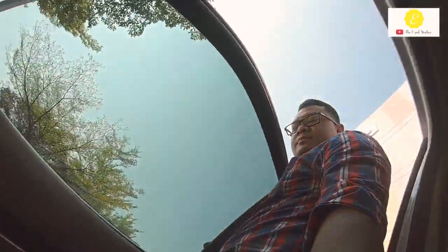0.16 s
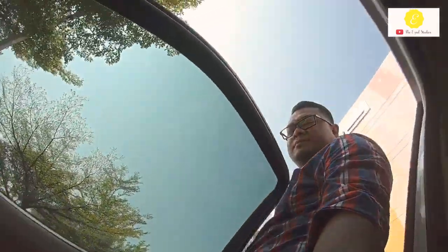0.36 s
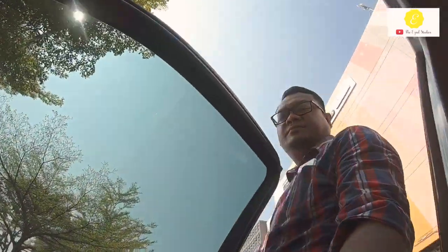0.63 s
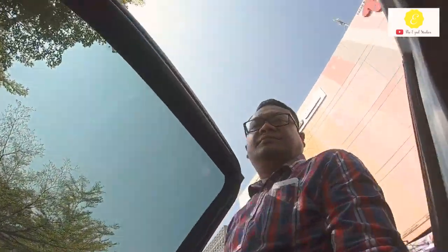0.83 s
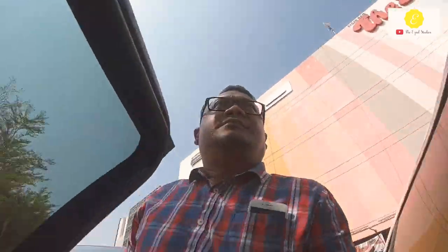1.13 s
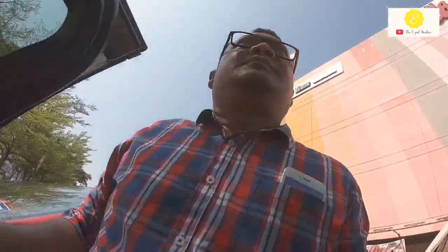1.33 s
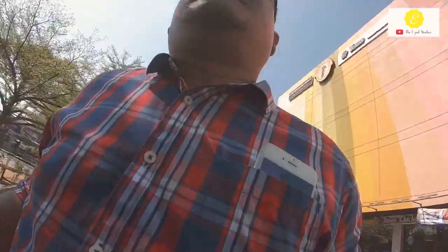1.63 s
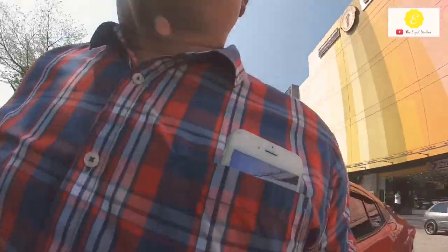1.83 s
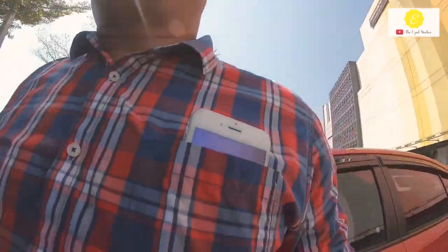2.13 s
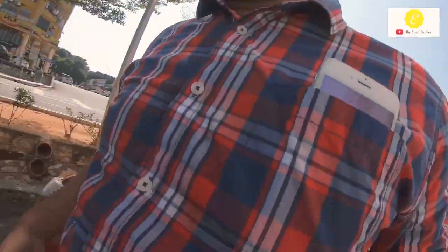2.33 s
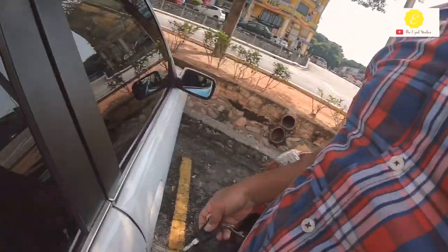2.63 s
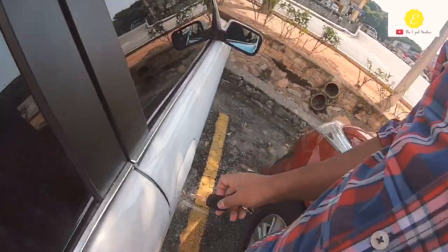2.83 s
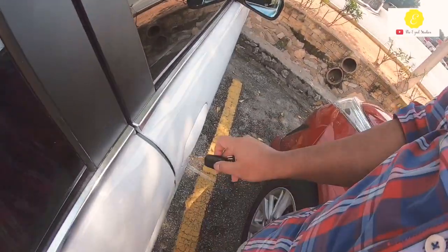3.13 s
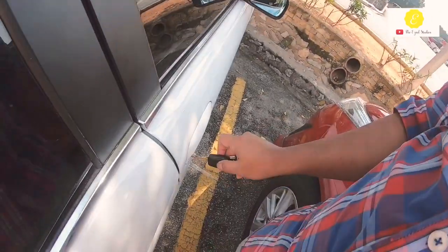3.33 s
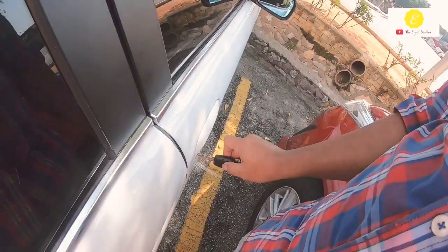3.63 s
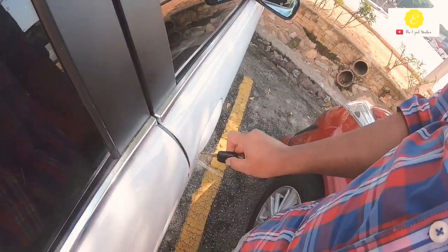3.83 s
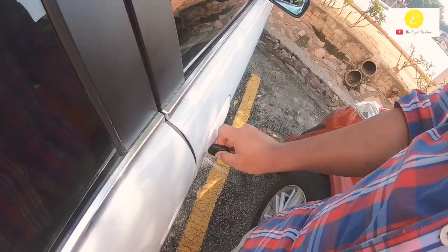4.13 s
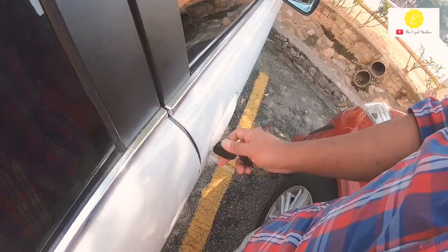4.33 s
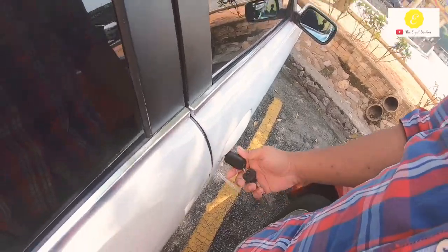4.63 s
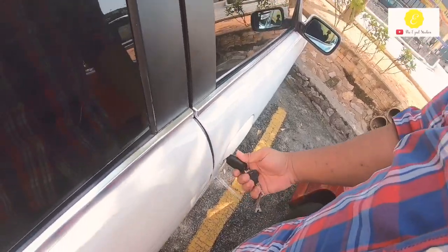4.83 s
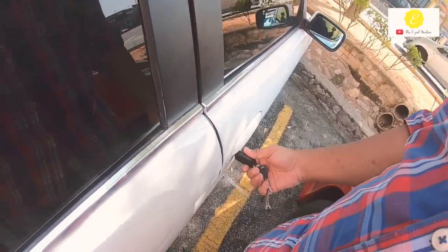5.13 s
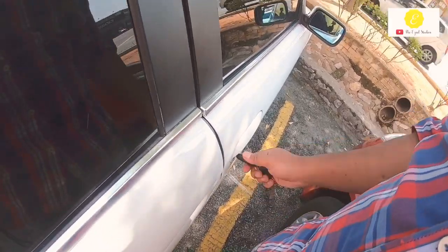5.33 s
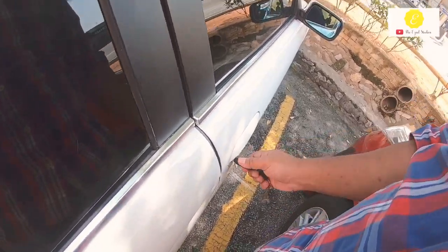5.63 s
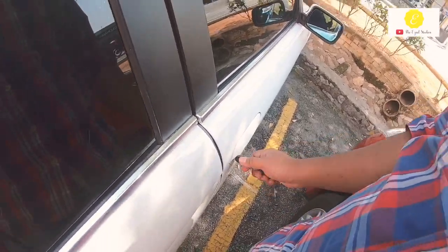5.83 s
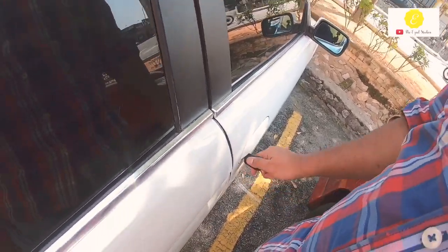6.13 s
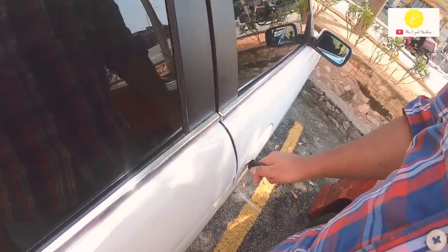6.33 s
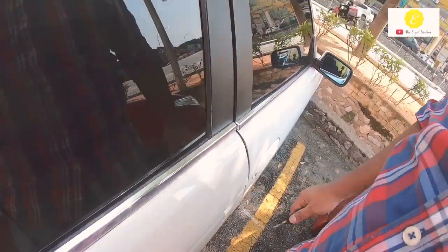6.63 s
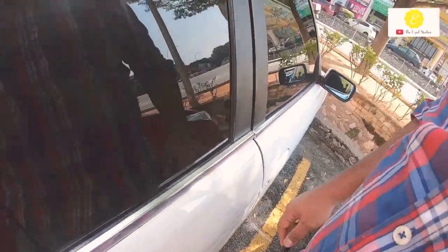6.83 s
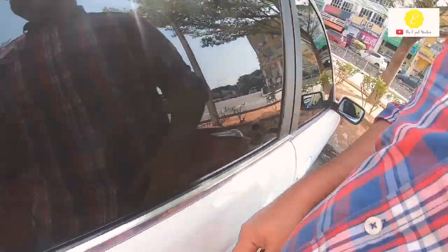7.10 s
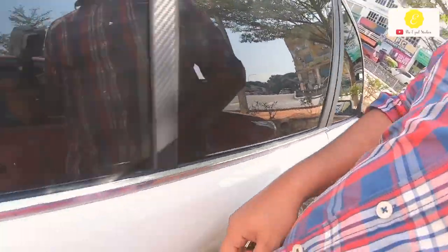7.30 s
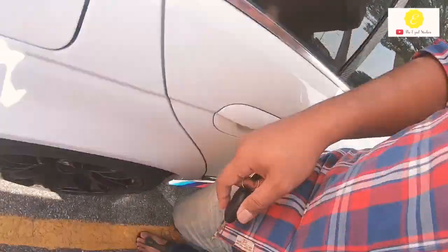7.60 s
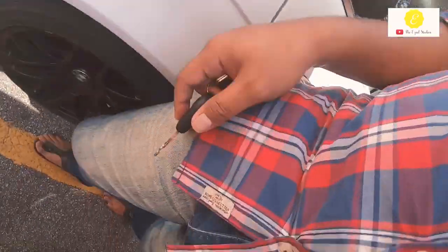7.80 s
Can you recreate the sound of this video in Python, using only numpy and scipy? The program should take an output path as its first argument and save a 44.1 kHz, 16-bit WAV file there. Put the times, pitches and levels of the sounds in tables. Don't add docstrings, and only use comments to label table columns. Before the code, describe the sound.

Close, hand-held microphone in an outdoor car park. Soft thumps, finger taps and cloth rustle come first over low traffic and wind rumble. A car door latches and slams loudly, with a boomy body and short echo. Then a key clicks and tinkles in the door lock, which throws sharply, as a lorry accelerates past, drops its revs in a gear change and fizzes its tyres, followed by a slow thumping engine.

```python
import sys
import numpy as np
from scipy import signal
from scipy.fft import rfft, irfft, next_fast_len
from scipy.io import wavfile
from scipy.ndimage import uniform_filter1d, map_coordinates

SR = 44100
rng = np.random.default_rng(int(sys.argv[2]) if len(sys.argv) > 2 else 0)


def put_to_file(sound):
    columns = np.atleast_2d(sound).T
    safe = np.clip(columns, -1, 1)
    whole_steps = np.round(safe * 32767)
    wavfile.write(sys.argv[1], SR, whole_steps.astype(np.int16))


def rack_gain(trim_db):
    fader = np.asarray(trim_db, float)
    return 10 ** (fader / 20)


N = 350947


def unit(x):
    return x / np.sqrt(np.mean(x ** 2) + 1e-20)


def along(points, hz):
    f, v = np.transpose(points)
    return np.interp(np.log(hz + 1), np.log(f + 1), v)


def curves(rows):
    s, *cols = np.transpose(rows)
    return [np.interp(np.arange(N) / SR, s, c) for c in cols]


def gate(start, end, fade):
    t = np.arange(N) / SR
    return np.clip(np.minimum(t - start, end - t) / fade, 0, 1)


def humps(rows):
    t = np.arange(N) / SR
    return sum(np.interp(t, [s - half, s, s + half], [0, height, 0]) for s, half, height in rows)


def wobble(rate):
    coarse = np.arange(0, N + 32, 32)
    knots = rng.standard_normal(int(N * rate / SR) + 4)
    return np.interp(np.arange(N), coarse, map_coordinates(knots, [coarse * rate / SR]))


def filtered(x, response):
    m = next_fast_len(x.shape[-1] + 8192)
    return irfft(rfft(x, m) * response(np.fft.rfftfreq(m, 1 / SR)), m)[..., :x.shape[-1]]


def steep(modes):
    def response(f):
        total = 0
        for k, (centre, width, db) in enumerate(modes):
            damping = 1j * f * width
            total = total + (-1) ** k * rack_gain(db) * damping / (centre ** 2 - f ** 2 + damping)
        return total ** 2
    return response


def rush(spectrum, patchy_db, grain=1):
    # (frequency [Hz], side minus mid [dB])
    width = [(60, -19), (110, -22), (200, -22), (380, -21), (700, -10), (1290, -7), (2380, -9), (4400, -10),
             (8120, -3), (15000, -1)]
    wider_db = 1
    z = signal.stft(grain * rng.standard_normal((2, N)), nperseg=512)[2]
    field = uniform_filter1d(rng.standard_normal(z.shape[1:]), size=6, axis=0)
    field = uniform_filter1d(field, size=12, axis=1)
    pair = signal.istft(z * rack_gain(patchy_db * unit(field)), nperseg=512)[1][:, :N]

    def colour(hz):
        mid_db = along(spectrum, hz)
        return rack_gain([mid_db, mid_db + along(width, hz) + wider_db])

    mid, side = filtered(pair, colour)
    return np.array([mid + side, mid - side]) / np.std(mid)


def order(turns, multiple, db, unsteady, smear=0):
    phase = 2 * np.pi * multiple * turns + smear * multiple ** 2 + unsteady * wobble(9)
    return np.sqrt(2) * rack_gain(db) * np.cos(phase)


def burst(length, t60, response, blow, rise_s=1e-4):
    t = np.arange(length) / SR
    noise = rng.standard_normal(length)
    noise[0] = blow
    envelope = rack_gain(-60 * t / t60) * np.minimum((t + 1e-4) / rise_s, 1)
    x = filtered(noise * envelope, response)
    return x / np.abs(x).max()


def place(out, s, sound):
    out[round(s * SR):][:len(sound)] += sound


def thud(length, t60):
    # (frequency [Hz], width [Hz], level [dB])
    padded = [(298, 460, 3), (800, 670, 2), (1600, 930, -3.5)]
    return burst(length, t60, steep(padded), blow=1.7)


def small_hit(click_db, knock_db, knock_hz, glint_db, t60, rise_s=1e-4):
    # (frequency [Hz], width [Hz], level [dB])
    click = [(2700, 2530, -1), (4450, 1920, 5.5), (5400, 1830, 3.5), (7940, 1700, -4.5)]
    # (frequency [Hz], width [Hz], level [dB])
    glint = [(9500, 5900, -3), (12300, 2500, -6.5), (14000, 2000, -9)]
    body = [(knock_hz, 0.57 * knock_hz, 0)]
    layers = [(click_db + 2.5, click), (knock_db + 5.5, body), (glint_db + 9.5, glint)]
    return sum(rack_gain(db) * burst(4096, t60, steep(modes), blow=4, rise_s=rise_s) for db, modes in layers)


def traffic():
    # (time [s], loudness [dB], nearness as brightness [dB])
    passing = [(0.0, -31.5, -9.5), (0.33, -33.5, -11), (1.35, -31, -11.5), (1.95, -32, -7.5),
               (2.5, -30.5, -11.5), (3.3, -25.5, -8.5), (3.83, -23.5, -9), (4.36, -25, -9),
               (5.3, -25, -7.5), (5.85, -29, -2.5), (6.58, -28, -3), (7.09, -27.5, -2.5), (7.34, -28, -3.5),
               (7.62, -27, -7.5), (7.96, -36.5, -2.5)]
    # (time [s], half length [s], lift [dB])
    gusts = [(.1, 0.11, 10), (.25, 0.85, 10), (3.3, 0.38, 11), (4.4, 0.59, 5.5), (5.1, 0.36, 6),
             (7.7, 0.96, 12)]
    # (time [s], half length [s], lift [dB])
    swing = [(2.2, 0.3, 9)]
    # (frequency [Hz], level per Hz [dB])
    rumble = [(8.8, -37.5), (15, 2.5), (48, -4.5), (70, -11), (90, -9.5), (120, -33), (200, -120)]
    drone = [(35, -15.5), (60, 0.5), (129, -3.5), (204, -6), (262, -10), (338, -18), (450, -23),
             (580, -50.5), (990, -120)]
    roar = [(210, -8.5), (350, -3), (450, -3.5), (499, -4), (769, -8.5), (1070, -10), (2300, -22.5),
            (2990, -52), (5060, -120)]
    hiss = [(1060, -7), (1800, -4), (3290, -4), (4160, -9.5), (4640, -9), (5810, -16.5), (8030, -21),
            (9700, -32), (10800, -32.5), (15500, -57)]
    # (frequency [Hz], gain [dB])
    dip = [(560, -2.5), (720, -3.5), (980, -5), (1250, 1)]
    loud_db, bright_db = curves(passing)
    push_db = humps(swing)
    rumble_db = -40 + humps(gusts)
    drone_db = loud_db + push_db
    roar_db = loud_db + bright_db + 0.77 * push_db
    hiss_db = -40.5 + 0.49 * (loud_db + 28.5) + 1.323 * (bright_db + 3.5) + 0.5 * push_db
    swell = wobble(2.17)
    low = rack_gain(rumble_db + 1.9 * wobble(4.6)) * rush(rumble, patchy_db=1.5)
    low += rack_gain(drone_db + 0.3 * swell) * rush(drone, patchy_db=1.0)
    high = rack_gain(roar_db + 0.3 * swell) * rush(roar, patchy_db=1.2)
    high += rack_gain(hiss_db + 0.7 * swell) * rush(hiss, patchy_db=1.5)
    high += gate(6.6, 9, fade=0.78) * filtered(high, lambda hz: rack_gain(along(dip, hz)) - 1)
    return low + 0.76 * high


def idling_engine():
    # (time [s], frequency [Hz], level [dB])
    hum = [(0, 193.9, -43), (2.5, 198.2, -38.5), (3.7, 195.3, -32), (4.1, 198.3, -44), (7.96, 200.3, -48.5)]
    hz, hum_db = curves(hum)
    return order(np.cumsum(hz) / SR, 0.99, hum_db + 3 * wobble(4.96), unsteady=0.56)


def rustle():
    # (start [s], hardest [s], end [s], level [dB], sheen [dB])
    strokes = [(0, 0.014, 0.17, -53, -15), (0.127, 0.134, 0.24, -64, -28), (0.525, 0.538, 0.63, -54, -18),
               (0.903, 0.908, 0.98, -54.5, -5), (0.93, 1.023, 1.1, -52, -4.5),
               (1.23, 1.336, 1.55, -47, -13), (1.267, 1.37, 1.57, -48, -16.5),
               (1.33, 1.444, 1.46, -63, -13), (1.632, 1.635, 1.67, -50.5, -9),
               (1.672, 1.697, 1.85, -50, -13), (1.903, 2.1, 2.6, -65, -27), (2.38, 2.523, 2.71, -57, -8),
               (4.183, 4.208, 4.21, -39.5, -14.5), (4.359, 4.415, 4.8, -54, -5),
               (5.258, 5.278, 4.8, -39, -8)]
    # (frequency [Hz], level per Hz [dB])
    fabric = [(710, -41), (1200, -12), (2010, -2.5), (2450, -7.5), (3870, -4.5), (9000, -17), (11700, -47),
              (19800, -120)]
    # (frequency [Hz], level per Hz [dB])
    gloss = [(4120, -26), (7000, -9), (7940, 0), (9260, -16), (10600, -12.5), (15500, -33)]
    cloth = rush(fabric, patchy_db=2.0, grain=rack_gain(1.5 * wobble(400) + 0.9 * wobble(59.7)))
    sheen = rush(gloss, patchy_db=3.0, grain=rack_gain(2 * wobble(300)))
    rise_db, fall_db = 16, 13
    out = np.zeros((2, N))
    for start, hardest, end, db, sheen_db in strokes:
        press_db, = curves([(start, db - rise_db), (hardest, db), (end, db - fall_db)])
        out += gate(start - 0.005, end, fade=0.015) * rack_gain(press_db) * (cloth + rack_gain(sheen_db) * sheen)
    return out


def hands():
    # (time [s], level [dB], decay t60 [s])
    thumps = [(0.082, -29, 0.024), (.216, -41, 0.027), (0.361, -30, 0.034), (.614, -34, 0.064),
              (1.217, -23, 0.074), (2.6, -30, 0.025), (3.409, -26, 0.028)]
    # (time [s], click [dB], knock [dB], knock frequency [Hz])
    taps = [(.083, -46, -38, 1400), (0.098, -46, -36, 1090), (0.14, -44, -33, 1600),
            (0.366, -46, -39, 1150), (0.911, -45, -33, 2040), (1.318, -40, -42, 1800),
            (1.362, -33, -36, 2050), (1.369, -33.5, -37, 2000), (1.418, -45, -43, 1880),
            (1.462, -40, -47, 2400), (1.573, -36, -52, 1250), (1.6405, -36, -40, 1500),
            (1.6973, -46.5, -38, 1400), (2.106, -34.5, -48, 1250), (2.4994, -42, -54, 1110),
            (3.2124, -34.5, -39, 1320), (3.409, -42, -38, 1300), (7.29, -34, -52, 1990),
            (7.565, -37, -44.5, 2400), (7.8155, -46, -40, 2600), (7.85, -38, -36.5, 2413),
            (7.9, -38, -43, 2800)]
    out = np.zeros(N + SR)
    for s, db, t60 in thumps:
        place(out, s, rack_gain(db) * thud(4096, t60))
    for s, db, knock_db, hz in taps:
        place(out, s, small_hit(db, knock_db, hz, glint_db=db - 23.5, t60=0.022))
    return out[:N]


def grip():
    # (time [s], low ring [dB], high ring [dB])
    shifts = [(.612, -39, -50), (.908, -34, -35), (1.01, -42, -41), (1.03, -42, -46), (1.214, -50, -44),
              (1.31, -42, -46), (1.33, -35, -45), (1.375, -42, -43), (1.445, -41, -50), (1.641, -24, -29),
              (1.694, -33, -28), (7.146, -31, -36), (7.24, -39, -48), (7.321, -42, -28), (7.347, -27, -29),
              (7.465, -45, -38), (7.622, -38, -40)]
    # (frequency [Hz], level [dB], decay t60 [s])
    case_low = [(75, 1, .06), (232, 0, .13)]
    case_high = [(640, 0, .07), (1330, -12, .04)]
    out, t = np.zeros(N + SR), np.arange(SR // 4) / SR
    soft_start = 1 - np.exp(-t / 0.002)
    for s, low_db, high_db in shifts:
        for db, modes in [(low_db, case_low), (high_db, case_high)]:
            for hz, level, t60 in modes:
                tone = np.sin(2 * np.pi * hz * t * rng.normal(1, 0.04))
                place(out, s, rack_gain(db + level - 60 * t / t60) * tone * soft_start)
    return out[:N]


def panel_drones():
    # (start [s], end [s], start frequency [Hz], end frequency [Hz], level [dB])
    squeaks = [(.89, 1.07, 2050, 2030, -55.5)]
    # (start [s], end [s], start frequency [Hz], end frequency [Hz], level [dB])
    panels = [(2.35, 2.85, 690, 720, -49), (5.15, 5.75, 760, 860, -43), (5.7, 6.08, 1830, 1730, -48),
              (6.0, 6.31, 1800, 1770, -47.5), (5.72, 6.02, 1200, 1230, -43), (6.58, 6.9, 1530, 1560, -44.5),
              (6.58, 6.8, 1330, 1370, -47), (6.8, 7.12, 2130, 2180, -53), (6.98, 7.42, 1750, 1750, -48),
              (7.0, 7.8, 2500, 2440, -51.5), (7.3, 7.95, 1180, 1120, -50), (7.46, 7.82, 1700, 1620, -50.5)]
    # (start [s], end [s], start frequency [Hz], end frequency [Hz], level [dB])
    sweeps = [(6.06, 6.3, 3050, 3800, -48), (6.26, 6.5, 1950, 3200, -47), (5.8, 6.1, 1420, 1500, -46),
              (7.1, 7.5, 1350, 1500, -48), (6.72, 6.9, 5750, 5850, -50)]
    out = np.zeros(N)
    for rows, width_hz in [(panels + squeaks, 150), (sweeps, 600)]:
        for start, end, from_hz, to_hz, db in rows:
            hz = np.interp(np.arange(N) / SR, [start, end], [from_hz, to_hz])
            phase = 2 * np.pi * np.cumsum(hz) / SR
            band = (72 / width_hz + wobble(width_hz)) * np.cos(phase) + wobble(width_hz) * np.sin(phase)
            out += gate(start, end, fade=0.051) * rack_gain(db + 1.3 * wobble(12)) * band
    return out


def door():
    # (time [s], level [dB])
    latch = [
        (2.183, -21.5),
        (2.192, -6),
        (2.203, -22),
        (2.213, -17),
    ]
    # (time [s], boom [dB], panel [dB], crack [dB])
    slam = [(2.222, -10, -9.5, -10), (2.227, -18, -6, -7.5), (2.242, -13, -2, -16.5),
            (2.256, -18, -14, -19), (2.263, -10.5, -2.5, -22), (2.282, -31, -6, -26),
            (2.305, -32, -13, -33), (2.334, -19, -24, -26.5), (2.366, -15.5, -27, -36)]
    # (time [s], frequency [Hz], level [dB], decay t60 [s])
    cabin = [
        (2.2265, 108, -0.5, 0.033),
        (2.2417, 61.6, -14.5, .08),
        (2.259, 30, -11.5, 0.47),
        (2.2645, 114, -11.5, 0.034),
    ]
    # (frequency [Hz], level [dB], decay t60 [s])
    striker = [(320, -3, 0.064), (477, -3, 0.06), (568, 2.5, 0.1), (623, 1, 0.045), (750, -4, 0.03),
               (910, -7, .04), (1280, -7, 0.034)]
    boom = [(43, -8, 0.21), (73, 0, 0.35), (83, 2.5, 0.23), (151, -6, 0.11)]
    panel = [(242, -1, 0.12), (326, 5.5, 0.047), (490, 1.5, 0.036), (577, -12.5, 0.09), (674, -16, 0.078),
             (867, -13, 0.035), (1080, -29, 0.02), (1380, -20, 0.047)]
    # (frequency [Hz], level per Hz [dB])
    snap = [(180, -27), (300, 1.5), (474, -11.5), (703, -9.5), (1170, -9), (1270, -15), (3790, -23),
            (8600, -37), (15000, -57)]
    out, t = np.zeros(N + SR), np.arange(SR // 2) / SR

    def ring(modes, scatter=0.05):
        total = np.zeros(len(t))
        for hz, db, t60 in modes:
            decay = rack_gain(db + rng.normal(0, 2.2) - 60 * t / t60)
            total += decay * np.sin(2 * np.pi * hz * t * rng.normal(1, scatter))
        return (1 - np.exp(-t / 0.0026)) * total

    for s, db in latch:
        place(out, s, rack_gain(db - 6.0) * ring(striker, scatter=0.012) + rack_gain(db - 6.5) * thud(len(t), 0.084))
    for s, boom_db, panel_db, crack_db in slam:
        crack = rack_gain(crack_db) * burst(len(t), 0.12, lambda hz: rack_gain(along(snap, hz)), blow=2)
        place(out, s, rack_gain(boom_db - 9.0) * ring(boom) + rack_gain(panel_db - 9.5) * ring(panel) + crack)
    for s, hz, db, t60 in cabin:
        place(out, s, rack_gain(db - 60 * t / t60) * np.sin(2 * np.pi * hz * t))
    return out[:N]


def key():
    # (time [s], click [dB], glint [dB])
    contacts = [(3.9444, -43, -60), (3.971, -34.5, -55), (4.07, -41, -58.5), (4.0847, -41.5, -61.5),
                (4.125, -33.5, -53), (4.148, -32.5, -53), (4.185, -34.5, -55), (4.1975, -31, -56),
                (4.2063, -20, -48), (4.398, -46, -61), (4.41, -47, -43.5), (4.461, -43.5, -58.5),
                (5.295, -35, -42), (5.311, -40.5, -49.5), (5.6599, -25.5, -59), (5.712, -25, -55.5),
                (6.249, -30, -54), (6.505, -27, -50), (6.538, -31, -46)]
    # (time [s], frequency [Hz], level [dB], decay t60 [s])
    tinkles = [(3.971, 12300, -48, .04), (4.407, 9510, -44, .05), (4.407, 13900, -43, .06),
               (4.408, 6000, -46, .04), (4.46, 14000, -58, .04), (4.535, 12500, -58, .05),
               (4.634, 12900, -56, .03), (5.29, 13500, -52, .05), (5.295, 7000, -38, .03),
               (5.653, 3950, -30, .07), (5.654, 2450, -32, .06), (5.704, 3350, -29, .07),
               (5.704, 4100, -31, .06), (6.538, 4230, -30, .04), (6.538, 3580, -32, .04),
               (6.54, 5860, -34, .04), (6.812, 5910, -34, .07), (6.815, 3450, -36, .07)]
    out, t = np.zeros(N + SR), np.arange(4096) / SR
    for s, db, glint_db in contacts:
        place(out, s, small_hit(db, db - 4, 1320, glint_db, t60=0.016))
    for s, hz, db, t60 in tinkles:
        tone = np.sin(2 * np.pi * hz * t) * (1 - np.exp(-t / 0.0013))
        place(out, s, rack_gain(db - 60 * t / t60) * tone)
    return out[:N]


def lock_throws():
    # (time [s], click [dB], knock [dB], knock frequency [Hz])
    throws = [
        (5.278, -30, -31, 1550),
        (5.579, -32.5, -31.5, 2000),
        (5.6506, -21, -24, 2090),
        (5.701, -19, -32.5, 1690),
    ]
    # (frequency [Hz], width [Hz], level [dB])
    skin = [(810, 340, 0)]
    rise_s = 0.0029
    out = np.zeros(N + SR)
    for s, db, knock_db, hz in throws:
        place(out, s, small_hit(db, knock_db, hz, glint_db=db - 23, t60=0.045, rise_s=rise_s))
    for s, db, *_ in throws + [(4.2062, -26)]:
        place(out, s, rack_gain(db - 11 + 8.5) * burst(4096, 0.1, steep(skin), blow=2, rise_s=rise_s))
    return out[:N]


def yard(x):
    # (frequency [Hz], decay t60 [s])
    echo_t60 = [(100, 0.13), (1000, 0.14), (10000, 0.28)]
    hz, t, z = signal.stft(rng.standard_normal((2, SR // 2)), SR, nperseg=256)
    tail = signal.istft(z * rack_gain(-60 * t / along(echo_t60, hz)[:, None]), SR, nperseg=256)[1]
    late = np.pad(x, (300, 0))[None]
    return signal.fftconvolve(late, tail / np.linalg.norm(tail[0]), axes=1)[:, :N]


def firings():
    # (time [s], firing rate [Hz], throttle as level of order 2 [dB])
    pull = [(2.7, 39.1, -72), (3.05, 40.1, -42), (3.14, 42.15, -27), (3.6, 48.42, -24.5),
            (3.93, 51.43, -20), (4.12, 53.68, -18.5), (4.8, 61.11, -23), (5.3, 65.21, -21.5),
            (5.72, 68.48, -16), (6.04, 69.85, -19), (6.14, 66.34, -33), (6.42, 57.68, -29),
            (6.59, 51.05, -24.5), (6.65, 49.83, -22.5), (6.82, 50.05, -34), (7.27, 51.64, -27),
            (7.63, 51.45, -25), (7.82, 52.3, -37.5)]
    hz, throttle_db = curves(pull)
    turns = np.cumsum(hz) / SR
    return hz, throttle_db, turns - turns[round(6.5805 * SR)]


def lorry():
    # level at full throttle [dB], and share of throttle swings they follow
    upper_full_db = [-26, -31.5, -44.5, -47.5]
    upper_follows = [0.6, 0.13, 0.13, 0.15]
    other_orders = [1, 1.5, *range(7, 25)]
    # (time [s], half length [s], gain [dB])
    nulls = [
        [(3.52, 0.13, -8), (3.8, 0.082, -16), (4.31, 0.21, -21), (5.0, 0.046, -2), (4.72, 0.055, -7),
         (5.775, 0.097, -6), (7.44, 0.082, -5)],
        [(3.05, 0.12, -15), (3.6, 0.059, -22), (4.25, 0.15, -18), (4.75, 0.42, -5), (5.72, 0.34, -7),
         (7.08, 0.42, -21), (7.7, 0.17, -7)],
        [(3.3, 1, -9.5), (5.1, .15, 3.5), (5.93, 0.24, 5), (6.75, 0.25, 8), (6.98, 0.19, -7),
         (7.52, 0.33, -8.5)],
        [(4.5, 0.26, -2), (5.4, .3, -1), (5.93, 0.2, 14.5), (6.3, 0.41, 12.5), (6.6, 0.16, 11), (7.1, .3, 10),
         (7.5, 0.27, 11.5)],
        [(4.7, 0.26, -1), (5.58, 0.23, 12.5), (6.1, 0.17, 2), (6.45, 0.3, 14), (6.75, 0.21, 21.5),
         (7.2, 0.36, 15), (7.5, 0.25, 8)],
    ]
    # (time [s], half length [s], gain [dB])
    shared_dips = [(4.03, 0.073, -16), (5.2, 0.077, -6), (7.27, 0.039, -16.5)]
    # (time [s], half length [s], gain [dB])
    facing = [(5.95, .3, 8), (6.54, .4, 16), (6.95, .3, 10), (7.33, .45, 13)]
    # (first order, last order, time [s], half length [s], gain [dB])
    muted = [(7, 7, 7.4, .3, -17), (9, 9, 7.35, .35, -7), (14, 24, 7.45, .45, -8), (7, 7, 6.85, .2, 4)]
    # (frequency [Hz], gain [dB])
    pipe = [(50, -4.5), (100, -8), (330, 4.5), (430, -5.5), (520, -4.5), (620, -3), (720, -10),
            (900, -11.5), (1300, -18.5)]
    hz, throttle_db, turns = firings()
    swing_db = throttle_db + 14.5
    shared_dip_db = humps(shared_dips)
    upper_db = [db + share * swing_db for db, share in zip(upper_full_db, upper_follows)]
    rest_db = -49.5 + 0.14 * swing_db + humps(facing) + 0.2 * shared_dip_db
    out = np.zeros(N)
    for k, (db, rows) in enumerate(zip([throttle_db, *upper_db], nulls), 2):
        out += order(turns, k, db + shared_dip_db + humps(rows) + wobble(12), unsteady=0.3, smear=0.7)
    for k in other_orders:
        mute_db = humps([row[2:] for row in muted if row[0] <= k <= row[1]])
        even_db = 3 * (0.5 - k % 2)
        db = rest_db + mute_db + along(pipe, k * hz) + even_db + 1.8 * wobble(5)
        out += order(turns, k, db, unsteady=0.55, smear=0.04)
    return gate(2.1, 9, fade=0.69) * out


def tyres():
    # (frequency [Hz], level per Hz [dB])
    fizz = [(2060, -12), (3500, 0.5), (5340, -4), (5800, -1.5), (6400, -4), (7620, -2), (13200, -27),
            (15500, -33.5)]
    # (time [s], half length [s], depth [dB])
    chuff = [(6.56, .25, 3)]
    t = np.arange(N) / SR - 6.774
    come_s, leave_s = 0.64, 0.57
    spread = 1 + (t / np.where(t < 0, come_s, leave_s)) ** 2
    fizz_db = -40.5 - 1.82 * 10 * np.log10(spread) ** 0.91
    fizz_db += humps(chuff) * np.cos(2 * np.pi * firings()[2])
    pan_db = 0.5 + 5 * gate(7.72, 9, fade=0.52)
    noise = rush(fizz, patchy_db=2.1, grain=rack_gain(1.5 * wobble(250)))
    return gate(4.24, 9, fade=0.57) * rack_gain(fizz_db + [pan_db / 2, -pan_db / 2]) * noise


def flank():
    # (order, [(time [s], level [dB])])
    sideways = [(9, [(4.3, -60), (4.5, -50), (5.3, -50), (5.75, -56), (6, -70)]), (8, [(4.6, -66),
                (5.2, -54), (5.65, -50), (5.95, -66)]), (12, [(5.3, -66), (5.65, -49), (5.95, -54),
                (6.2, -66)])]
    turns = firings()[2]
    tones = sum(order(turns, k, curves(rows)[0] + 1.5 * wobble(8), unsteady=0.3) for k, rows in sideways)
    return tones * gate(4.25, 6.25, fade=0.1)


def gear_whine():
    # (time [s], frequency [Hz], level [dB])
    mesh = [(5.57, 2835, -66), (5.62, 2855, -52), (5.84, 2915, -52), (5.9, 2935, -46), (6.0, 2952, -45),
            (6.06, 2925, -48), (6.11, 2865, -49), (6.16, 2850, -66)]
    hz, whine_db = curves(mesh)
    turns = np.cumsum(hz) / SR + 0.09 * wobble(90)
    return gate(5.5, 6.2, fade=0.03) * order(turns, 1, whine_db + 3 * wobble(50), unsteady=0.5)


def thumper():
    # (time [s], firing rate [Hz], level [dB], exhaust turned this way [dB])
    pulses = [(6.2, 22.3, -49, 4), (6.34, 22.47, -22, -23), (6.47, 23.56, -31, -19),
              (6.65, 24.05, -37.5, -4), (6.93, 24.44, -29.5, -18), (7.39, 25.43, -24, -26),
              (7.61, 24.6, -30, 3), (7.8, 23.03, -27.5, -0.5), (7.94, 24.95, -30.5, 4)]
    hz, db, turn_db = curves(pulses)
    turns = np.cumsum(hz) / SR
    out = np.zeros(N)
    for k, facing, trim_db in [(2, 1.1, -16), (3, 1.4, -1.5), (4, 0.86, 0.1), (5, 0, 0), (6, 1.1, -10)]:
        out += order(turns, k, db + facing * turn_db + trim_db, unsteady=0.076)
    return gate(6.15, 9, fade=0.1) * out


def scene():
    near = hands() + door() + key() + lock_throws()
    gap_s = 1 / SR
    ports = filtered(np.array([near, near]), lambda hz: np.exp(np.array([[1j], [-1j]]) * np.pi * hz * gap_s))
    walls = rack_gain(-19) * yard(near)
    tones = panel_drones() + gear_whine()
    engines = lorry() + thumper() + tones
    turned = np.imag(signal.hilbert(engines + 4 * tones, next_fast_len(N))[:N])
    aside = rack_gain(-22) * turned + flank()
    panned = engines * rack_gain(-0.5 * gate(5.9, 12, fade=2.5) * [[0.5], [-0.5]])
    beds = traffic() + idling_engine() + rustle()
    return ports + walls + panned + [aside, -aside] + tyres() + beds


def band_limit(x):
    return signal.sosfilt(signal.butter(12, 15650, fs=SR, output="sos"), x)


def record(dry):
    # (time [s], width [dB])
    stereo = [(.45, -89), (.62, -18), (.95, -2), (1.75, 4.5), (2.1, -19), (2.24, -87), (3.7, -63),
              (4.15, -12.5), (4.9, -1.5), (7.96, 3.5)]
    # (frequency [Hz], gain [dB])
    port_colour = [(230, .5), (330, -5), (600, 2.5), (2500, .5), (3900, -19), (4900, -.5)]
    mid, side = (dry[0] + dry[1]) / 2, (dry[0] - dry[1]) / 2
    below = filtered(side, lambda hz: hz < 11000)
    narrowed = rack_gain(curves(stereo)[0]) * filtered(below, lambda hz: rack_gain(along(port_colour, hz)))
    side = side - below + narrowed + grip()
    guarded = np.array([mid + side, mid - side])
    rounded = guarded / (1 + np.abs(guarded / 0.78) ** 4) ** (1 / 4)
    mix = filtered(rounded, lambda hz: hz < 15650)
    return band_limit(mix)


dry = scene()
out = record(dry)
put_to_file(out)
```